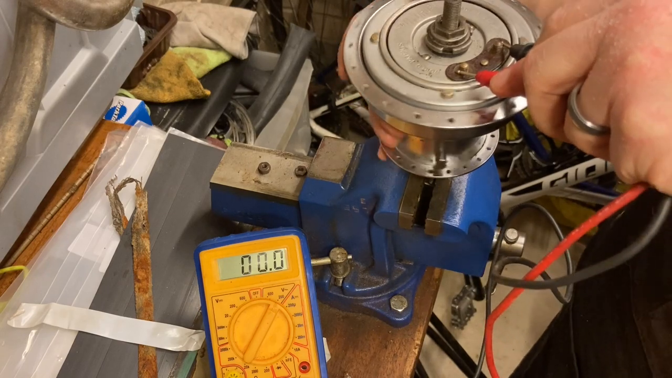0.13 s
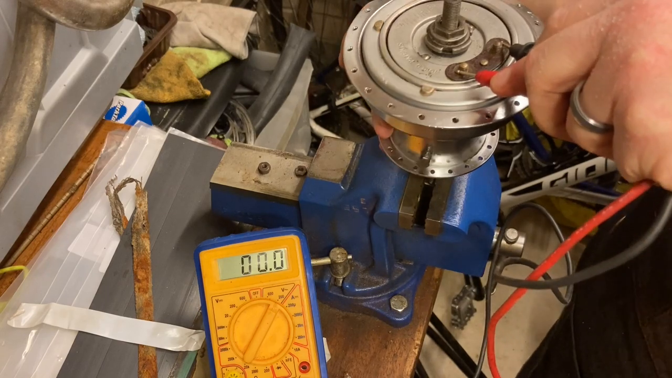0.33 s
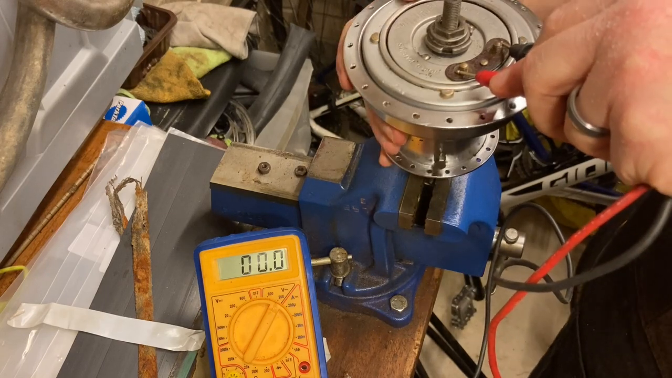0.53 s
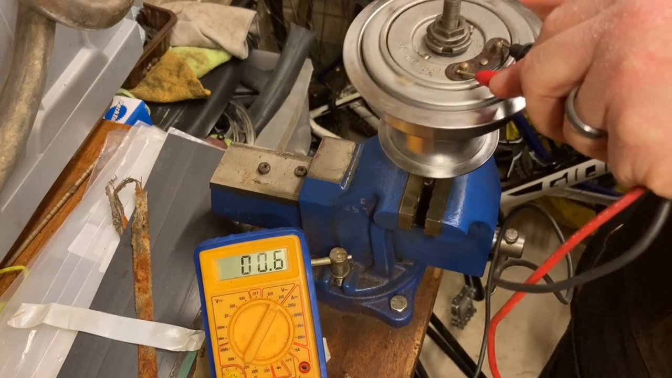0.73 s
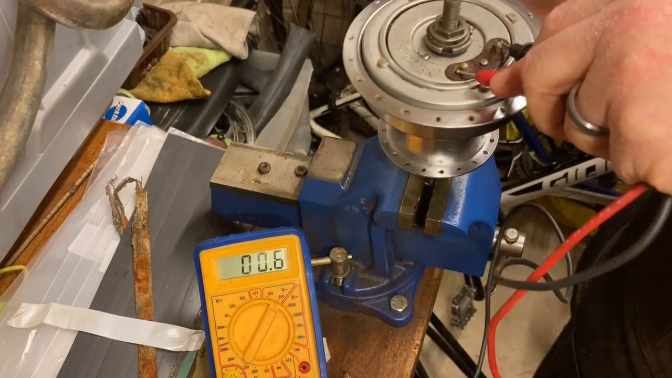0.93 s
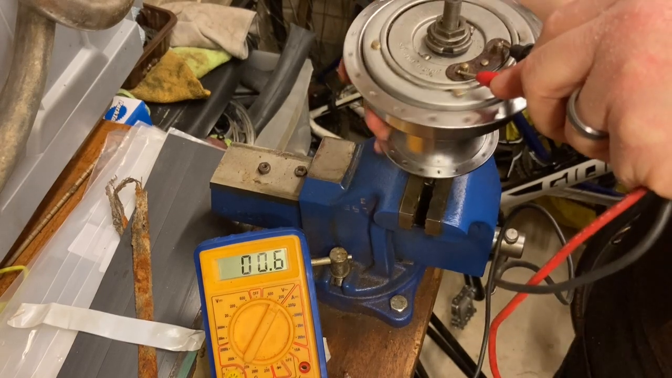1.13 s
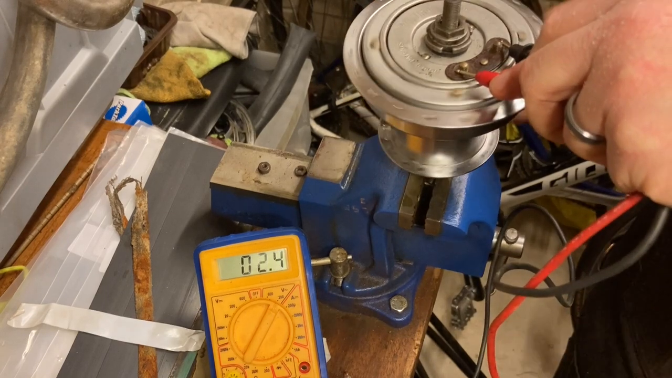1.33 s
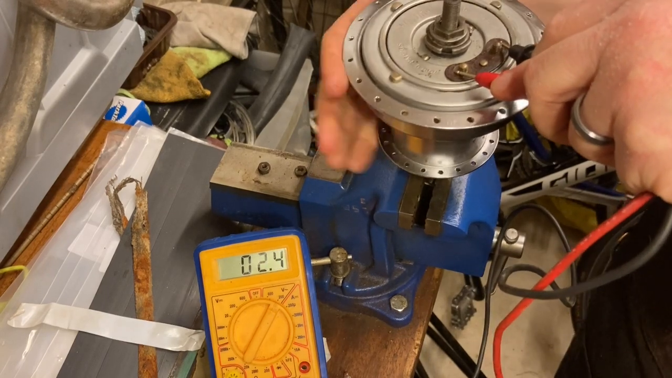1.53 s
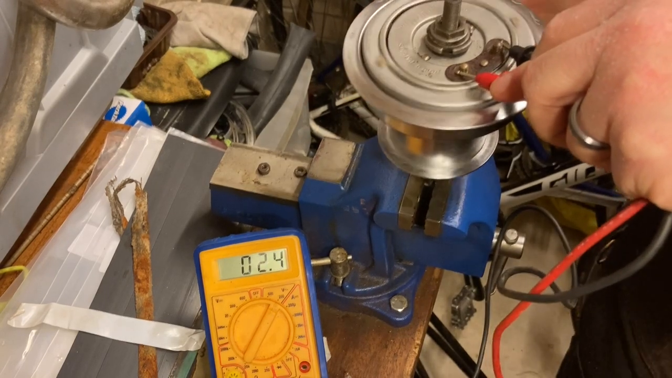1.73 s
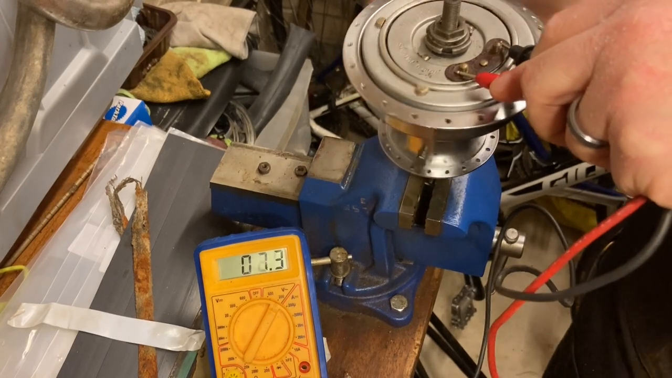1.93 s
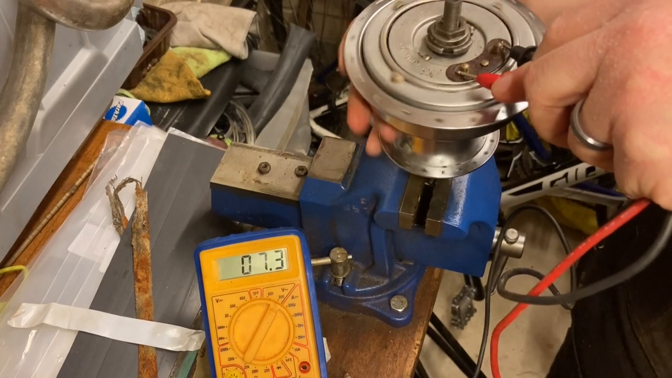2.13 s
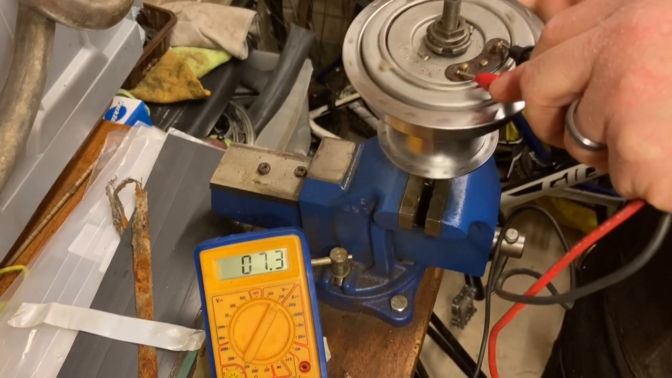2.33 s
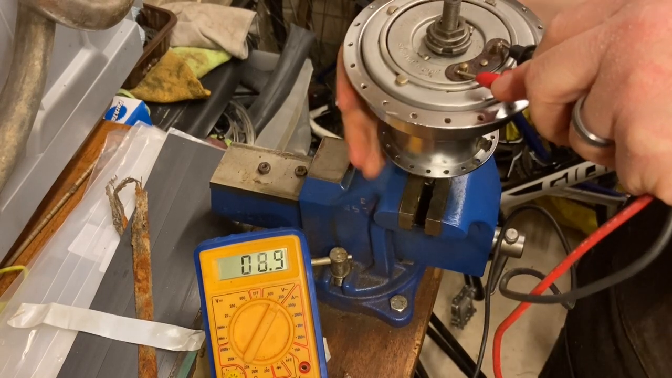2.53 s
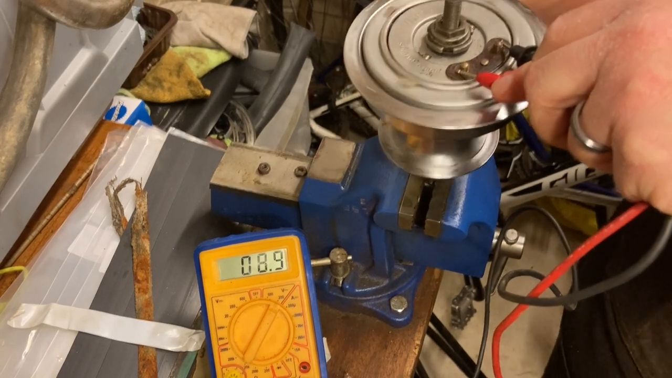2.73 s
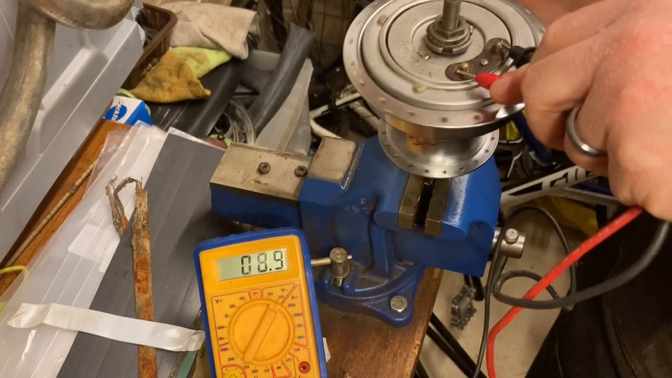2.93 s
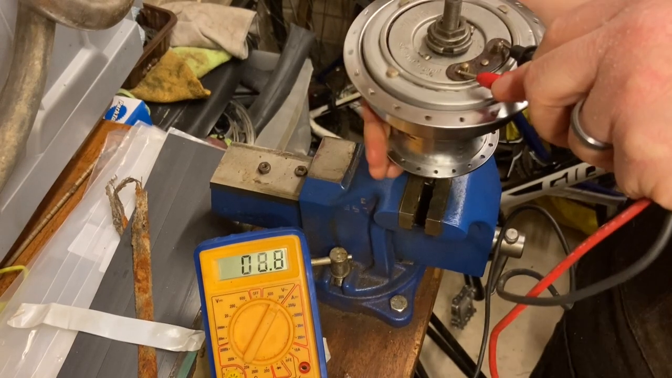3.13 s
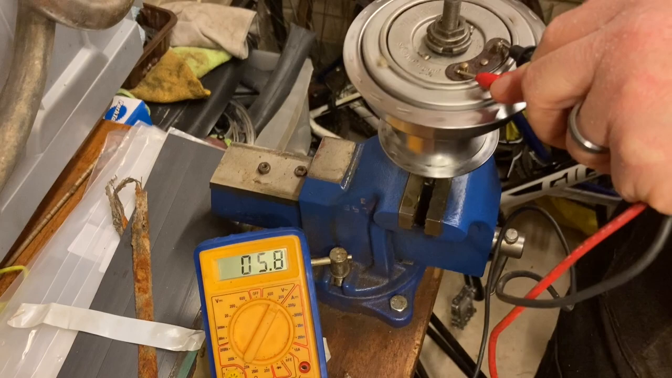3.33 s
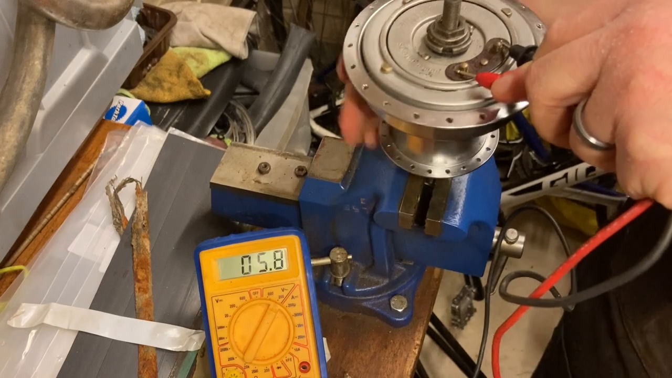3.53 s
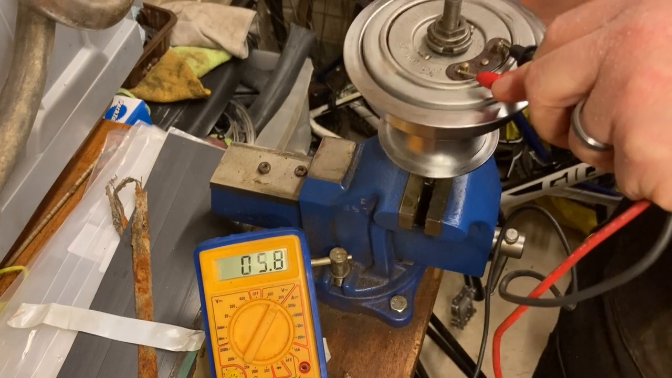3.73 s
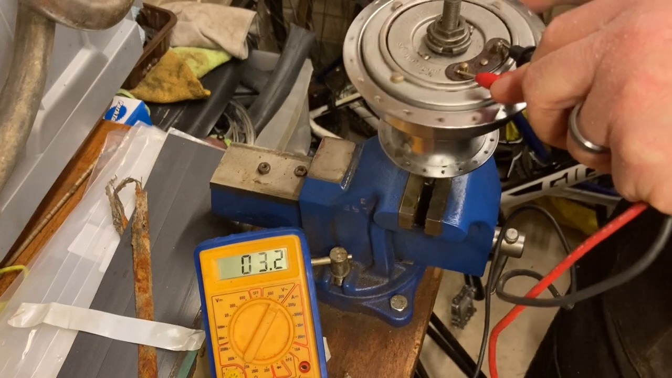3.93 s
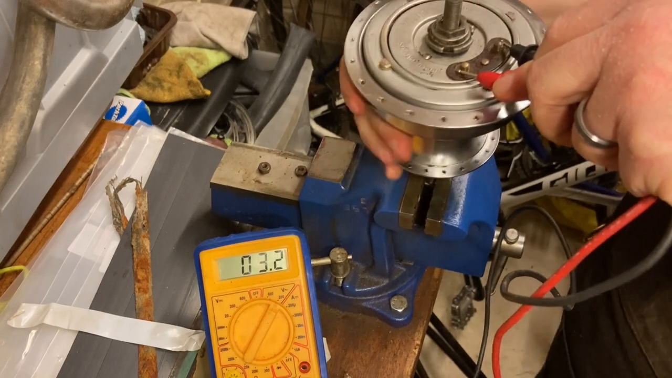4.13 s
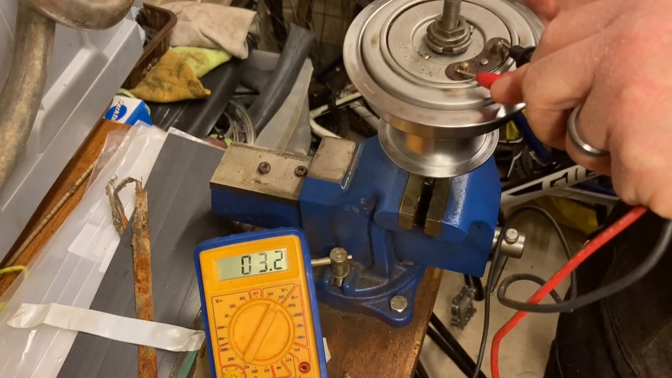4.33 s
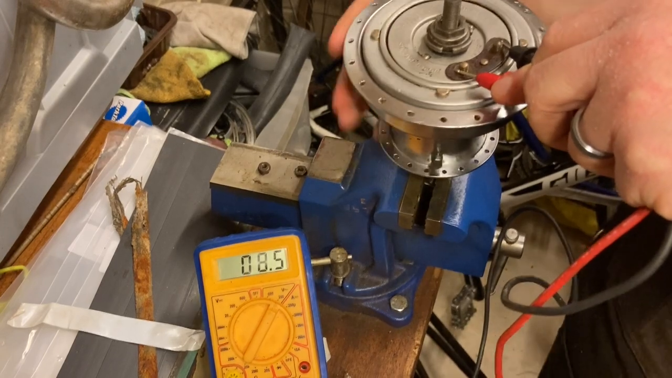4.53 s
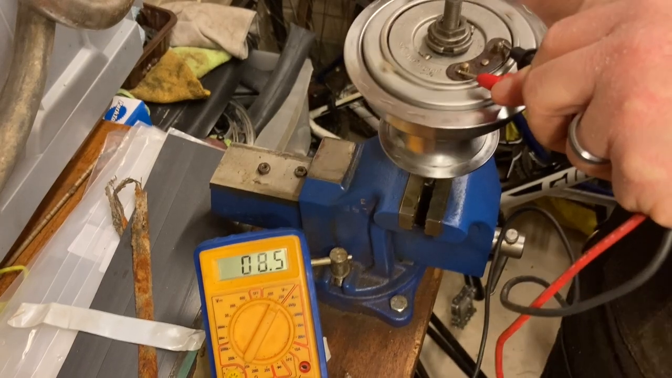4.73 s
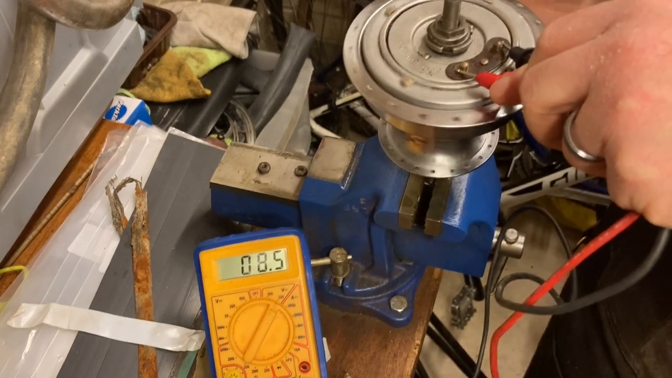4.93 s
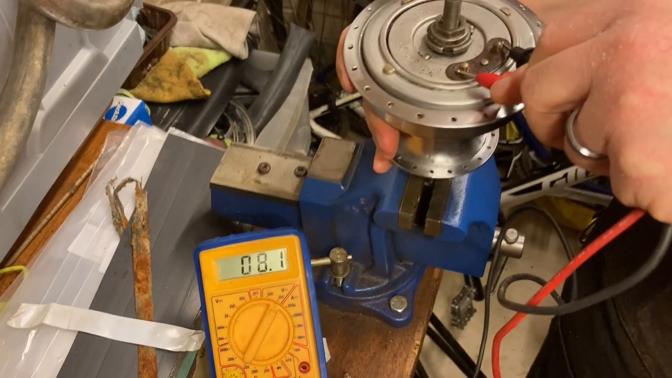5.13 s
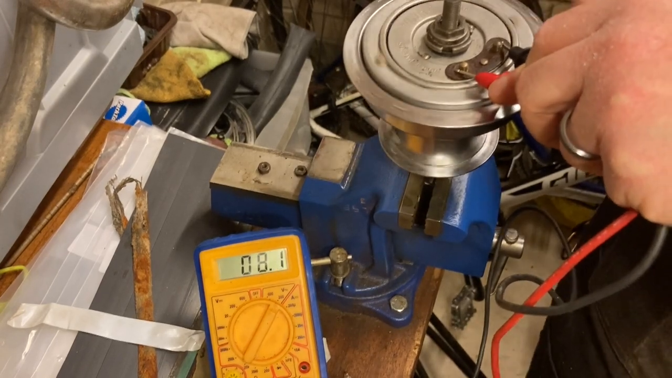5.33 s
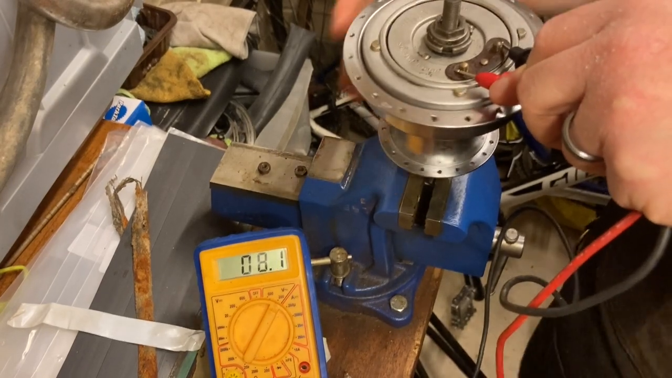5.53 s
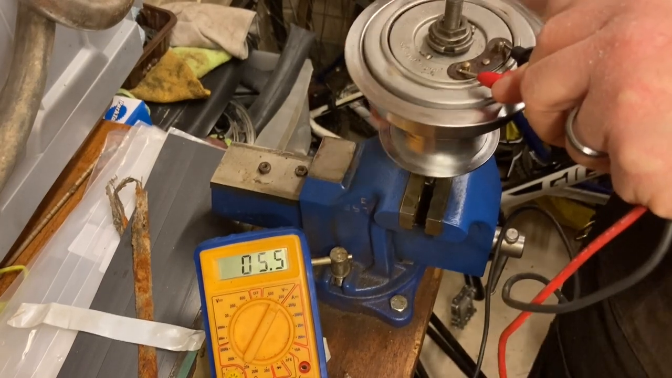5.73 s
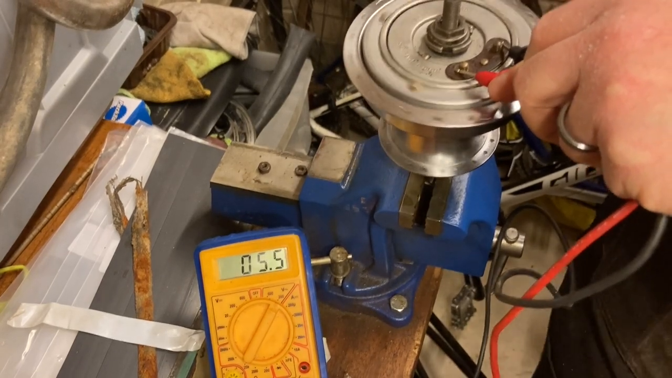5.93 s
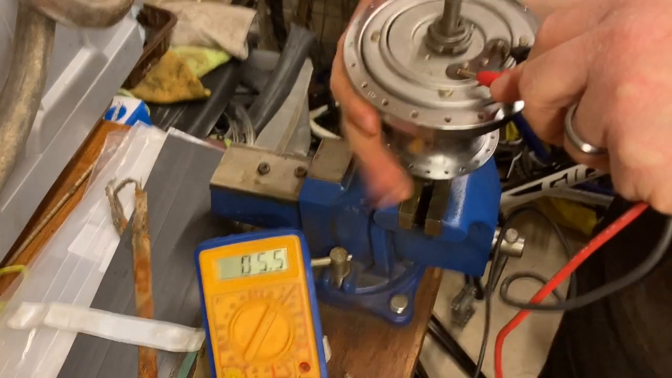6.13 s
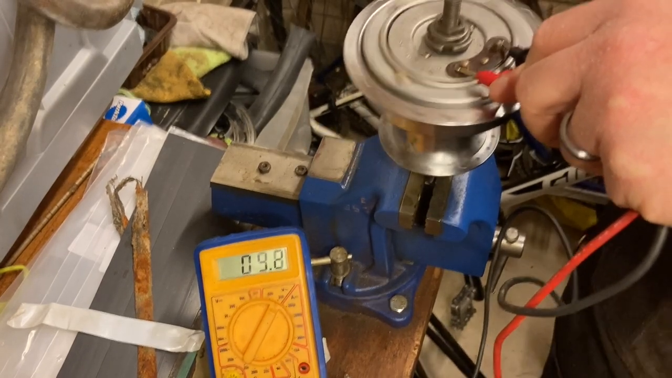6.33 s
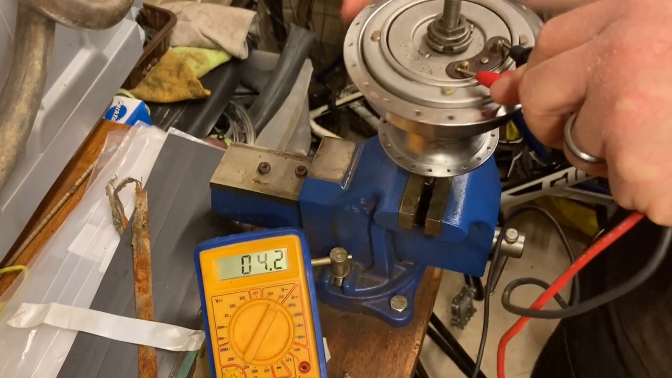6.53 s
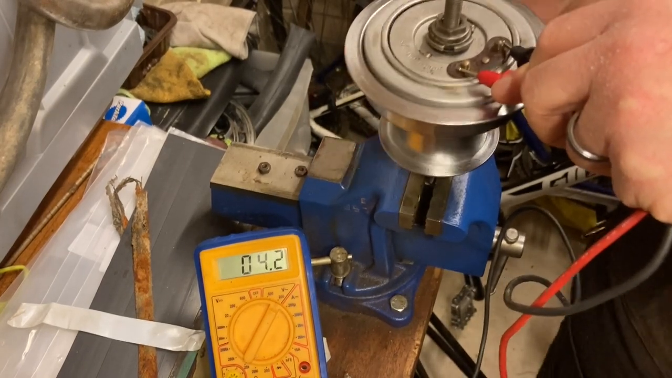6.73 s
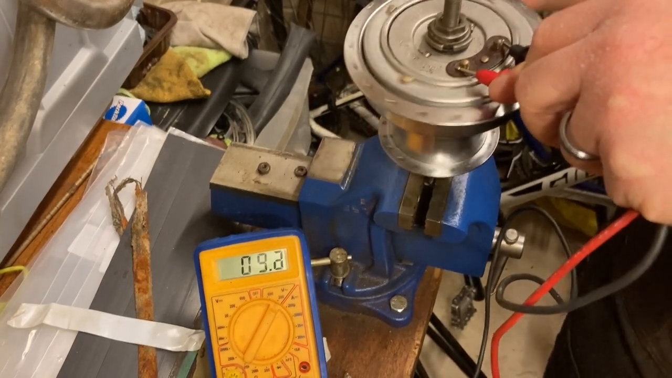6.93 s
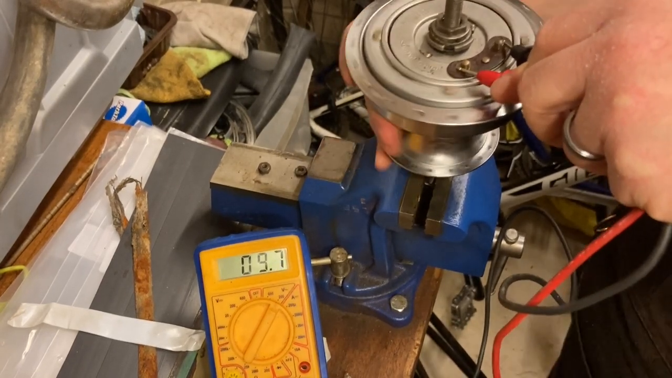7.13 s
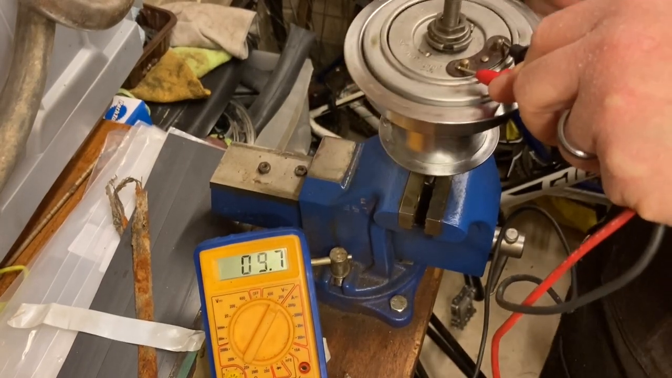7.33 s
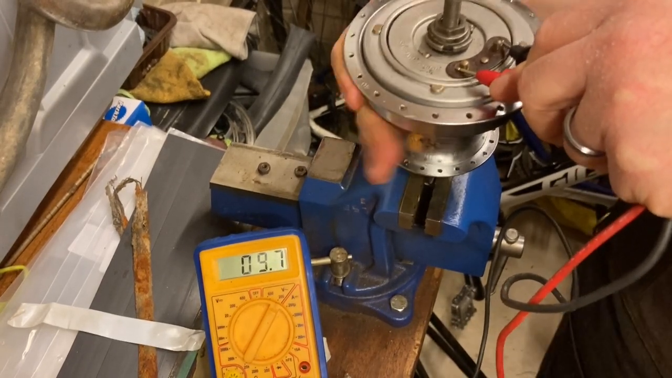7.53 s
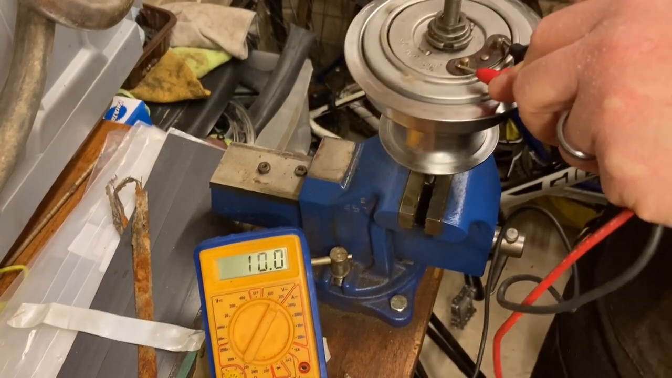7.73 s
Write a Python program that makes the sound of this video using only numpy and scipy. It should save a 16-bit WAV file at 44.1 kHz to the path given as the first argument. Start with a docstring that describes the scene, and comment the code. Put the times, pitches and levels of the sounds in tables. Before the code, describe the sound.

A metal wheel hub clamped in a bench vice is spun by hand twice a second, each push a short rattling whirr with hiss and ticks.

```python
"""On a wooden bench, a metal dynamo hub clamped in a vice is spun by hand about twice a second.
Each push makes the magnets cog and the innards rattle: pulses, grains and noise ring hub, vice and bench.
Bearings and skin hiss as shell-coloured noise; small parts tick and the hand slaps as puffs with short rings.
The bench sways as swelling low sines, dull knocks are dying sines, and faint air noise lies below.
Two microphone ports close together hear it."""
import sys
import numpy as np
from scipy import signal
from scipy.io import wavfile
from scipy.ndimage import uniform_filter1d

SR = 44100
rng = np.random.default_rng(int(sys.argv[2]) if len(sys.argv) > 2 else 0)


def transcribe(u):
    """Save the signal u as a 16-bit wav file named by the first command-line argument.

    u: samples, shape (n,) or (channels, n), limited to [-1, 1]; the rate is SR.
    q: integer samples, one column per channel.
    """
    v = np.clip(np.atleast_2d(u).T, -1, 1)
    q = np.round(v * 32767).astype(np.int16)
    wavfile.write(sys.argv[1], SR, q)


def invert_db(level):
    """Linear amplitude ratio for a level in decibels (20 dB per decade), elementwise."""
    return 10 ** (np.asarray(level, dtype=float) / 20)


N = 343539


def evened(x):
    """Scales to rms 1."""
    return x / np.sqrt(np.mean(x ** 2) + 1e-20)


def read(points, hz):
    """A curve read on a log-frequency axis."""
    f, value = np.transpose(points)
    return np.interp(np.log(hz + 1), np.log(f + 1), value)


def colour(x, broad, modes, size=8192):
    """Minimum-phase filter, one for each ear: a broad response with resonances on top."""
    hz = np.abs(np.fft.fftfreq(size, 1 / SR))
    ears = []
    for side in (.5, -.5):
        db = read(broad, hz)
        for mode_hz, width_hz, lift_db, pan_db in modes:
            db = db + (lift_db + side * pan_db) / (1 + (2 * (hz - mode_hz) / width_hz) ** 2)
        log_gain = np.log(invert_db(db))
        phase = -signal.hilbert(log_gain).imag
        taps = np.fft.ifft(np.exp(log_gain + 1j * phase)).real
        ears.append(signal.oaconvolve(x, taps[:size // 2])[:N])
    return np.array(ears)


def ringing(drive, db, broad, modes):
    """A drive of even strength through a body, scaled so that db is about the rms level that comes out."""
    unit = np.sqrt(np.mean(colour(drive, broad, modes) ** 2))
    early_db = np.r_[db[400:], db[-400:]]  # the force comes a moment before the ring has built up
    return colour(drive * invert_db(early_db) / unit, broad, modes)


def grains(per_s, spread_db):
    """Random tiny impacts of either sign; a few are large."""
    hit = rng.random(N) < per_s / SR
    size = np.minimum(rng.exponential(1, N), 4)
    sign = rng.choice([-1., 1.], N)
    return evened(hit * sign * invert_db(spread_db * size))


def slow(seconds):
    """Slow random drift of rms 1: noise averaged twice over a span."""
    span = max(int(seconds * SR), 2)
    once = uniform_filter1d(rng.standard_normal(N), span)
    return evened(uniform_filter1d(once, span))


def patchy(x, depth_db, size=256):
    """Drifting patches of pitch and time grow louder or softer."""
    overlap = size * 3 // 4
    hz, t, z = signal.stft(x, SR, nperseg=size, noverlap=overlap)
    field = uniform_filter1d(rng.standard_normal((len(t), len(hz))), size=50, axis=0)
    field = evened(uniform_filter1d(field, size=7, axis=1))
    return signal.istft(z * invert_db(depth_db * field.T), SR, nperseg=size, noverlap=overlap)[1][:N]


def bursts(table, t60, width_hz, size=3000):
    """At each row a sharp puff of noise with a soft longer tail, plus a narrow wavering ring."""
    t, out = np.arange(size) / SR, np.zeros(N + size)
    crack, body, tail = invert_db(-4 - 60 * t / (0.11 * t60)), invert_db(-60 * t / t60), invert_db(-8.5 - 60 * t / 0.14)
    noise = rng.standard_normal((len(table), 2, size))
    for (s, db, hz, broad_db), (puff, waver) in zip(table, noise):
        at = round(s * SR)
        waver = 1 + .5 * evened(uniform_filter1d(waver, int(SR / width_hz)))
        ring = waver * np.sin(2 * np.pi * hz * t) * invert_db(-60 * t / (1.98 * t60))
        broad = invert_db(broad_db) * puff * (crack + body + tail)
        out[at:at + size] += invert_db(db) * (0.28 * broad + 0.44 * ring)
    return out[:N]


# spectrum of the quiet air: (frequency [Hz], density before levelling [dB per Hz])
AIR_SPECTRUM = [(24, -26), (40, 3), (75, 1), (965, -35), (3740, -29), (4680, -34), (6330, -23), (8340, -43),
                (16000, -38.5)]


def room_tone():
    """Faint steady air and microphone noise: shaped noise with one soft bump."""
    bump = (4750, 220, 5.6, 0)  # Hz, width Hz, dB, left minus right dB
    return invert_db(-70) * evened(colour(rng.standard_normal(N), AIR_SPECTRUM, [bump]))


# dull knocks of the hand on the hub: (time [s], starting level [dB], pitch [Hz])
KNOCKS = [(0.416, -48.5, 116), (2.596, -37, 191), (4.635, -44, 100), (7.507, -37, 104.7)]


def knocks():
    """Each knock is a low sine with a quick onset that dies away at once."""
    out, t = np.zeros(N), np.arange(4000) / SR
    for s, db, hz in KNOCKS:
        fall = invert_db(db - 60 * t / 0.076)  # 60 dB in 76 ms
        onset = np.minimum(t / 0.00078, 1)
        out[round(s * SR):][:len(t)] += fall * np.sin(2 * np.pi * hz * t) * onset
    return out


def bench_quiver(rumble_db):
    """Noise through a narrow double resonance at the lowest bench note, following the rumble."""
    hz, width_hz = 55, 25
    r = np.exp(-np.pi * width_hz / SR)
    noise = rng.standard_normal(N) + 1j * rng.standard_normal(N)
    drift = signal.lfilter([1], [1, -2 * r, r * r], noise)
    note = (drift * np.exp(2j * np.pi * hz * np.arange(N) / SR)).real
    return invert_db(-28.5 + 0.54 * rumble_db) * evened(note)


SWELL_DB = -14  # a grip or the dying side of a sway is this far down half its length from the peak

# the bench rocks at its lowest note: (peak time [s], length [s], peak level [dB], mean pitch [Hz])
SWAYS = [(0.235, .08, -66, 49.5), (0.439, .07, -60, 53.2), (0.725, .12, -52, 55), (0.892, 0.07, -45, 55),
         (0.994, 0.07, -65, 55), (1.145, 0.056, -46.5, 52.3), (1.268, 0.19, -49.5, 52.3),
         (1.43, 0.12, -51, 52.1), (1.522, .05, -60, 50.2), (1.623, .14, -46.5, 57.4),
         (1.833, 0.18, -57, 55), (1.983, 0.1, -46.5, 46), (2.08, 0.074, -58, 46.5),
         (2.16, 0.095, -57, 48.94), (2.267, 0.083, -57, 52.5), (2.371, .13, -40.5, 53.4),
         (2.552, .05, -54.5, 55), (2.652, 0.092, -38, 54.4), (2.82, .11, -44, 54),
         (3.002, .16, -45.5, 50.85), (3.127, 0.092, -56, 59.4), (3.22, .08, -55, 62.5),
         (3.347, .09, -44, 65.3), (3.456, 0.098, -43.5, 67.5), (3.595, 0.078, -59, 56.6),
         (3.827, 0.11, -52, 55.5), (3.93, 0.088, -46, 55.2), (4.0, 0.094, -51.5, 55.3),
         (4.172, 0.11, -44.5, 55.3), (4.368, 0.11, -46, 57.2), (4.471, 0.067, -52.5, 61),
         (4.569, 0.057, -53, 65.2), (4.662, 0.082, -41.5, 52.5), (4.793, 0.087, -50, 51.5),
         (4.921, 0.071, -47, 55), (5.007, 0.057, -41, 53.5), (5.211, 0.078, -43, 55.6),
         (5.299, .05, -53, 60), (5.377, 0.077, -39.5, 54.7), (5.47, .1, -48, 53),
         (5.57, 0.062, -44.5, 53.6), (5.715, 0.1, -39.5, 57.6), (5.805, 0.052, -40, 56.8),
         (5.967, 0.12, -42, 60.84), (6.078, .09, -47, 61.8), (6.206, 0.075, -31.5, 57.9),
         (6.265, 0.057, -41, 57), (6.422, 0.2, -44, 62.4), (6.599, 0.089, -46.5, 54.9),
         (6.701, 0.1, -37, 55.9), (6.772, .07, -46, 55.3), (6.879, .1, -47, 60.3),
         (6.97, 0.086, -44.5, 56.5), (7.055, 0.055, -47, 55.65), (7.172, 0.099, -28, 55.1),
         (7.248, .07, -40, 53.37), (7.33, 0.059, -40, 54.9), (7.407, 0.088, -45, 57.2),
         (7.545, 0.097, -48, 52), (7.625, 0.072, -32.5, 50.8), (7.742, 0.097, -39, 48.73)]


def bench_sways():
    """Sines of wavering pitch that build faster than they die."""
    rise_share, fall_bend = 0.68, 1.16
    out, waver = np.zeros(N), 1 + 0.084 * slow(0.011)
    for (s, length, peak_db, hz), turn in zip(SWAYS, rng.random((len(SWAYS), 1))):
        at = np.arange(max(round((s - 2 * length) * SR), 0), min(round((s + 4 * length) * SR), N))
        u = 2 * (at / SR - s) / length
        build = (np.minimum(u, 0) / rise_share) ** 2
        fall = np.maximum(u, 0) ** fall_bend
        db = peak_db + SWELL_DB * (build + fall)
        phase = turn + np.cumsum(hz * waver[at]) / SR
        out[at] += np.sqrt(2) * invert_db(db) * np.sin(2 * np.pi * phase)
    return out


# broad response of vice and bench: (frequency [Hz], gain [dB])
BENCH = [(40, -24), (90, 2), (200, -5), (400, -11.5), (600, -29), (800, -19), (3000, -62.5)]
# resonances of vice and bench: (frequency [Hz], width [Hz], lift [dB], left minus right [dB])
BENCH_MODES = [(93, 4.4, 5.4, 10.5), (125.4, 17, 8.5, 4), (164.4, 11.4, 6.8, -4.5), (224.8, 11, 12, 4.5),
               (291, 18, 4.8, -2.5), (331.3, 38, 7.4, 0), (434, 28.3, 12, -0.5), (479.8, 34.4, 14.3, -1.5),
               (536, 28, 11.4, 13.5)]


def bench_rumble(cogs, rattle, rumble_db):
    """Cogging, rattle and sparser, more uneven grains shake the resonances of vice and bench."""
    shake = 0.38 * cogs + 0.52 * rattle + 0.86 * grains(500, 3.3)
    return ringing(shake, rumble_db + 0.56 * slow(0.023), BENCH, BENCH_MODES)


# broad response of the hub shell: (frequency [Hz], gain [dB])
SHELL = [(300, -20), (1200, -5), (2300, 0.5), (3400, -3), (5300, -5.5), (6800, -1.5), (8500, -2.5),
         (10300, -6), (12500, -6), (14500, -13.5), (16000, -6)]
# resonances of the hub shell: (frequency [Hz], width [Hz], lift [dB], left minus right [dB])
SHELL_MODES = [(2450, 160, 0.71, -6.5), (4300, 290, 3.1, -2.2), (4750, 180, 3.1, -2.5),
               (8100, 170, 1.1, -1.5), (9000, 160, 3, 3), (11000, 580, 4.2, 0), (11400, 120, 2, 1),
               (12000, 75, 2.2, -8), (13100, 120, 4, -3)]


def hiss(rattle, hiss_db, treble_db):
    """Bearings and skin: noise, fine grains and some rattle, in drifting patches, ring the shell."""
    rough = rng.standard_normal(N) + 0.43 * grains(2500, 3.8) + 0.31 * np.abs(rattle)
    rub = evened(patchy(rough, 2.44))
    rub += 0.36 * evened(patchy(grains(140, 6.4), 7.5))  # stray grit and balls tick
    treble = signal.sosfilt(signal.butter(3, 9500, "high", fs=SR, output="sos"), rub)
    rub = rub - treble + treble * invert_db(treble_db)  # each rub of skin has its own brightness
    return ringing(rub, hiss_db + 1.57 * slow(0.003), SHELL, SHELL_MODES)


# ticks of small parts, before the shell colours them:
# (time [s], relative level [dB], ring pitch [Hz], broad part relative to the ring [dB])
TICKS = [(0.1404, -57, 8300, -2), (0.2638, -50, 4730, -12), (0.3004, -48, 8050, -11),
         (0.314, -47.5, 7950, 2.5), (0.5162, -57, 4650, 0), (0.596, -65, 8300, -3), (0.624, -56, 4530, 9.5),
         (0.6556, -45, 8000, 15), (0.6917, -34.5, 8600, -3), (1.1503, -41, 11400, -38),
         (1.193, -44.5, 8240, -8), (1.2466, -34, 8500, -2), (1.293, -30.5, 4750, 5), (1.4282, -46, 3840, 1),
         (1.4646, -48, 8400, 3), (1.6344, -52.5, 4460, 12), (1.6801, -48, 8530, 0), (1.699, -46, 7800, 8),
         (1.8632, -58, 2570, 15.5), (2.0936, -48.5, 4770, -1), (2.145, -47, 4760, 8),
         (2.2174, -52, 8220, 13), (2.4763, -44.5, 3900, 10), (2.6124, -49, 8000, -7),
         (2.6683, -50, 11400, 5), (2.7207, -56, 7600, 11), (2.8843, -46, 7700, 0),
         (3.0448, -40.5, 11400, -16), (3.1855, -29.5, 11400, -6.5), (3.2954, -43.5, 4263, -3),
         (3.45, -40.5, 3950, 0), (3.673, -36, 11300, -4), (3.7382, -46.5, 4320, 9),
         (3.8574, -48.5, 11000, 12), (4.145, -48, 7750, 1), (4.2064, -39, 3790, -1),
         (4.4087, -44.5, 10680, 10), (4.4287, -44, 4740, 2), (4.6326, -44, 11400, -2),
         (4.6705, -44.5, 8180, 6), (4.7152, -47, 7940, 9), (4.7586, -34.5, 8560, 1), (5.1764, -50, 8100, 5),
         (5.197, -40.5, 11400, 0.5), (5.2306, -44, 4000, 8.5), (5.3316, -37, 4780, 1),
         (5.4334, -44, 4260, 7), (5.713, -44, 11500, 8.5), (5.7597, -37, 10800, 2), (5.779, -33, 8060, 3.5),
         (6.037, -45, 8690, 3), (6.1462, -40, 7860, 4), (6.2536, -57, 7973, 5), (6.3116, -29, 11000, -2),
         (6.474, -44, 4576, 1), (6.4981, -48.5, 2670, 9), (6.5553, -50, 8170, 15), (6.6575, -42, 8390, 1.5),
         (6.9556, -45, 3836, 9.5), (7.1241, -44, 7700, 8.5), (7.5336, -49, 3875, 8), (7.577, -43, 7660, 4),
         (7.6125, -41.5, 4193, 5.5), (7.722, -33, 11000, 0)]


def ticks():
    """Small parts tick: noise puffs and very short rings through the shell."""
    return colour(invert_db(1.5) * bursts(TICKS, 0.015, 900), SHELL, SHELL_MODES)


# slaps of the hand on the hub shell, before colouring:
# (time [s], relative level [dB], ring pitch [Hz], broad part relative to the ring [dB])
SLAPS = [(0.14, -62, 1000, 9), (0.6544, -47, 1350, 6), (1.6367, -47.5, 990, 17), (1.7306, -43, 1050, 14.5),
         (2.0807, -61, 1090, 3), (2.2426, -35, 1420, -5), (2.6178, -52, 1073, 12), (2.775, -40, 1020, 3),
         (2.9163, -43, 1470, -4), (4.2025, -49, 1040, 11), (4.6298, -47, 1040, 15),
         (5.1597, -64, 1024, 19.5), (5.285, -54, 1050, 3), (5.3945, -41, 1023, 13.5), (5.673, -46, 1100, 7),
         (6.2556, -44, 1366, 9), (7.2, -39.5, 1064, 9.5), (7.3094, -36, 1009, -2), (7.4885, -46, 1336, -6),
         (7.676, -40.5, 1230, 3)]
# colour of a slap: (frequency [Hz], gain [dB])
SLAP_COLOUR = [(200, -44), (700, 1), (2500, -0.5), (5000, -21), (12000, -17)]


def slaps():
    """The hand slaps the shell: duller bursts than the ticks, with a longer ring."""
    return colour(invert_db(2.5) * bursts(SLAPS, 0.028, 230), SLAP_COLOUR, [])


def cogging(rattle_db):
    """Magnets cog: one-sample pulses of uneven size whose wavering rate climbs with the rattle level."""
    rate_hz = np.clip(195 + 9.0 * (rattle_db + 47), 30, 270) * (1 + .08 * slow(.01))
    pulses = np.diff(np.floor(np.cumsum(rate_hz) / SR), prepend=0)
    return evened(pulses * invert_db(1.12 * rng.standard_normal(N)))


def rattle_force(cogs):
    """The innards' drive: cogging pulses, dense small impacts and plain noise."""
    return 0.53 * cogs + 0.86 * grains(1200, 2.45) + 0.69 * rng.standard_normal(N)


# broad response of the hub body: (frequency [Hz], gain [dB])
BODY = [(200, -34), (550, 8.5), (700, 6.5), (1050, 4), (1500, -0.5), (1600, -7.5), (2500, -5.5),
        (3500, -23), (8000, -34)]
# resonances of the hub body: (frequency [Hz], width [Hz], lift [dB], left minus right [dB])
BODY_MODES = [(624, 46, 0.25, -9.5), (680, 8.2, 6.3, -19), (745, 24.4, 9.5, 10), (808.7, 50, 12.9, -7),
              (853, 76, 6.36, 12.5), (1027, 60, 6.7, 3), (1031, 18, 5.9, -4.5), (1203, 15.4, 0.45, -21),
              (1361, 180, 7, -3), (1513, 40, 2.8, -13.5)]


def hub_rattle(rattle, rattle_db):
    """The rattling innards ring the metal body of the hub."""
    return ringing(rattle, rattle_db + 0.42 * slow(0.012), BODY, BODY_MODES)


def together(*db):
    """Level of sounds heard at once: their powers add."""
    return 10 * np.log10(sum(invert_db(d) ** 2 for d in db))


def swell(t, middle, length, peak_db):
    """A level that rises and falls evenly round its middle."""
    return np.maximum(peak_db + SWELL_DB * (2 * (t - middle) / length) ** 2, -150)


def spin(t, start, rise, coast, push_share=1, coast_share=1):
    """Level under the top of one push: the fingers bite, the hub speeds up, then coasts down."""
    u = t - start - rise
    bite = -520 * np.maximum(start - t, 0)  # dB per s before the start
    speed_up = -12 * np.clip(-u / rise, 0, 1) ** 1.3
    slow_down = -32 * np.maximum(u / coast, 0) ** 1.2
    return push_share * (bite + speed_up) + coast_share * slow_down


def stroke(t, start, length, peak_db):
    """One rub of skin: it bites, sags, and stops fast when the hand lets go."""
    attack = 0.28  # share of the length
    u = (t - start) / length
    bite = -13 * np.maximum(1 - u / attack, 0)
    sag = -4.5 * np.clip((u - attack) / (1 - attack), 0, 1)
    release = -220 * length * np.maximum(u - 1, 0)  # 220 dB per s
    return peak_db + bite + sag + release


# pushes of the hand: (time the fingers bite [s], time to top speed [s], rattle level at top speed [dB],
# coasting time [s], bench rumble relative to the rattle [dB])
PUSHES = [(.662, 0.098, -43.5, 0.28, -0.5), (1.2, .085, -45.5, 0.27, 1.4), (1.675, 0.12, -46, 0.27, 2.5),
          (2.2, .065, -45, .32, 3), (2.725, 0.088, -43, 0.3, 1.4), (3.228, 0.097, -44, .27, 2),
          (3.725, 0.083, -42.5, .29, 0.5), (4.215, .1, -41.5, .3, 0.5), (4.735, .11, -48, .24, 5),
          (5.25, .068, -41, .3, 0.8), (5.765, .068, -39.5, .34, 0.6), (6.257, .05, -39.5, 0.37, -0.2),
          (6.746, 0.056, -41, .33, 1.1), (7.208, .1, -38.5, 0.28, 0), (7.675, 0.042, -39.5, .4, -1.5)]
# the hand closes round the hub and shakes it a little:
# (middle time [s], length [s], rattle level [dB], bench rumble level [dB])
GRIPS = [(0.208, .16, -72, -70), (0.43, 0.21, -103, -69.5), (1.611, 0.073, -67.5, -60.5),
         (2.107, 0.056, -71.5, -72), (2.175, .07, -63, -68), (2.634, 0.075, -66, -54),
         (3.132, 0.18, -71, -62.5), (3.69, 0.071, -66, -63), (4.137, 0.1, -74.5, -74),
         (4.641, .06, -58, -51.5), (5.21, .14, -62, -57), (5.693, .06, -65, -58), (5.741, 0.061, -62, -59),
         (6.19, .09, -68, -68), (6.683, .11, -70, -57.5), (7.135, .07, -66, -57), (7.503, 0.083, -59, -67),
         (7.617, .09, -63.5, -55.5)]
# skin rubs along the shell: (start time [s], length [s], hiss level [dB], treble gain above 9.5 kHz [dB])
RUBS = [(.09, 0.26, -68.5, 2), (.27, 0.092, -73, -8), (0.378, 0.054, -79, 20), (.5, 0.092, -79, 12),
        (0.651, 0.16, -54.5, -14), (0.91, 0.086, -68.5, 8.5), (1.16, 0.043, -78, 6),
        (1.187, 0.19, -55, -16), (1.41, 0.13, -67.5, -11), (1.546, 0.077, -65, 5), (1.665, .22, -56.5, 0),
        (2.098, .08, -65.5, 5), (2.17, 0.23, -54.5, -1), (2.466, 0.063, -64.5, 4), (2.6, 0.087, -61, 4),
        (2.687, 0.22, -54.5, -3), (2.993, 0.39, -54.5, 4), (3.19, 0.21, -56, -4), (3.69, 0.26, -56.5, 2.5),
        (4.071, 0.13, -67, 5), (4.192, 0.24, -54, -3), (4.585, 0.14, -61.5, 5), (4.699, 0.19, -53, 1.5),
        (5.046, 0.31, -65, 3.5), (5.22, 0.22, -55.5, -2), (5.698, 0.072, -63, 5), (5.752, 0.2, -48.5, 0.5),
        (5.966, 0.1, -56.5, 4), (6.1, 0.16, -63, 5), (6.254, .18, -48.5, -1), (6.449, 0.14, -64.5, 0),
        (6.57, 0.19, -61, -15), (6.728, 0.21, -53.5, -1.5), (7.081, .11, -60.5, -10),
        (7.174, .24, -50, -0.5), (7.527, 0.14, -61, -7), (7.664, .2, -47.5, 2)]


def hand_levels():
    """Rattle, rumble, hiss and treble gain in dB, drawn from the pushes, grips and rubs of the hand."""
    t = np.arange(0, N + 64, 64) / SR
    rattle, rumble, bearings = [-87], [-74], [-77.5]  # resting levels
    for start, rise, db, coast, rumble_rel in PUSHES:
        rattle.append(db + spin(t, start, rise, coast))
        rumble.append(db + rumble_rel + spin(t - 0.019, start, rise, coast, 0.81, 0.82))  # 19 ms late
        bearings.append(db - 18.5 + spin(t, start, rise, coast, 0.52, 0.52))
    for middle, length, rattle_db, rumble_db in GRIPS:
        rattle.append(swell(t, middle, length, rattle_db))
        rumble.append(swell(t, middle, length, rumble_db))
    skin = [stroke(t, s, length, db) for s, length, db, _ in RUBS]
    skin_treble = [stroke(t, s, length, db + gain) for s, length, db, gain in RUBS]
    hiss_db = together(*bearings, *skin)
    treble_db = together(*bearings, *skin_treble) - hiss_db
    curves = (together(*rattle), together(*rumble), hiss_db, treble_db)
    return [np.interp(np.arange(N) / SR, t, db) for db in curves]


# likeness of the two ports: (frequency [Hz], likeness [0-1])
SAME = [(60, .995), (130, .93), (300, .92), (600, .3), (800, .88), (1150, .35), (1500, .8), (1800, .2),
        (3000, .5), (4700, .75), (5400, .2), (6300, .8), (8000, .95), (16000, .9)]
# phase by which the right port leads: (frequency [Hz], lead [turns])
LEAD = [(0, -.06), (400, -.04), (1000, .02), (1500, .15), (2000, .45), (3200, .52), (4200, .95),
        (4900, .95), (5400, .65), (6300, .5), (16500, -2.5)]


def ports(x, size=1024):
    """Shifts the right port in phase and adds a part of slowly drifting random phase: less alike ears."""
    overlap = size * 3 // 4
    hz, t, z = signal.stft(x[1], SR, nperseg=size, noverlap=overlap)
    field = uniform_filter1d(rng.standard_normal((2, len(t), len(hz))), size=6, axis=1)
    a, b = uniform_filter1d(field, size=4, axis=2)
    random_phase = np.exp(1j * np.angle(a + 1j * b)).T
    same = np.clip(read(SAME, hz), 0, 1)[:, None]
    shift = np.exp(2j * np.pi * np.interp(hz, *np.transpose(LEAD)))[:, None]
    z = z * (same * shift + 1.244 * np.sqrt(1 - same ** 2) * random_phase)
    right = signal.istft(z, SR, nperseg=size, noverlap=overlap)[1]
    return np.array([x[0], right[:N]])


def scene():
    """Room tone, bench and hub at the microphone ports."""
    rattle_db, rumble_db, hiss_db, treble_db = hand_levels()
    cogs = cogging(rattle_db)
    rattle = rattle_force(cogs)
    low = bench_quiver(rumble_db) + bench_sways() + knocks()
    mix = room_tone() + low * invert_db(np.array([[-.3], [.3]]))  # a little stronger on the right
    mix += bench_rumble(cogs, rattle, rumble_db)
    mix += hiss(rattle, hiss_db, treble_db) + ticks() + slaps()
    mix += hub_rattle(rattle, rattle_db)
    return ports(mix)


def band_limit(x):
    """A steep low-pass at the top of the band."""
    return signal.sosfilt(signal.butter(12, 16480, fs=SR, output="sos"), x)


def record(dry):
    """Limits the band with a low-pass at 15.8 kHz and finishes the mix."""
    edge = signal.firwin(301, 15800, window=("kaiser", 3), fs=SR)
    mix = signal.oaconvolve(dry, edge[None], "same")
    return band_limit(mix)


dry = scene()
out = record(dry)
transcribe(out)
```